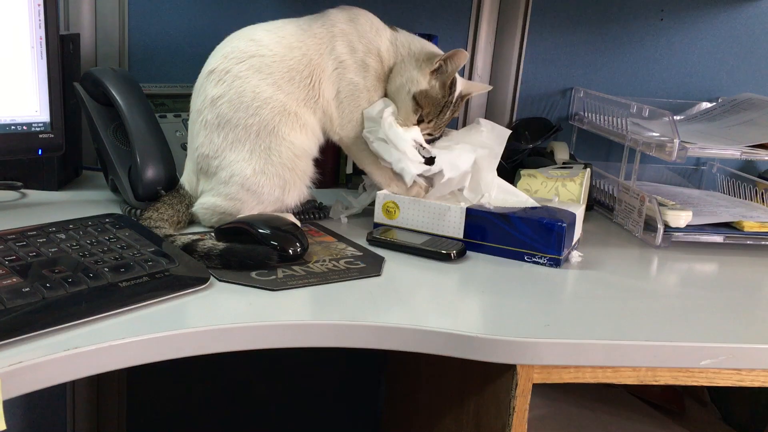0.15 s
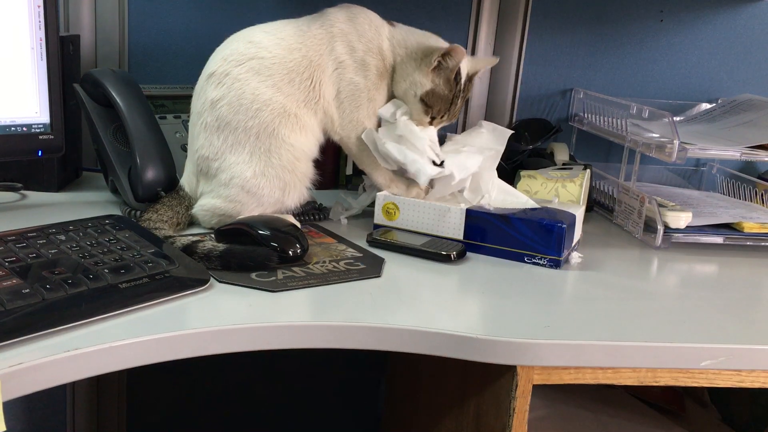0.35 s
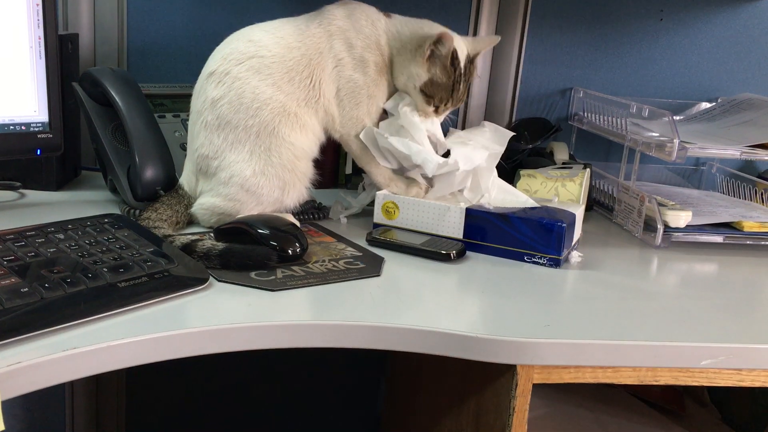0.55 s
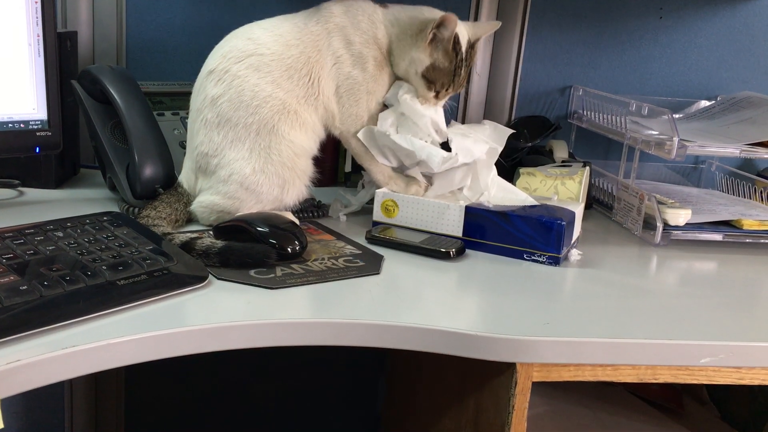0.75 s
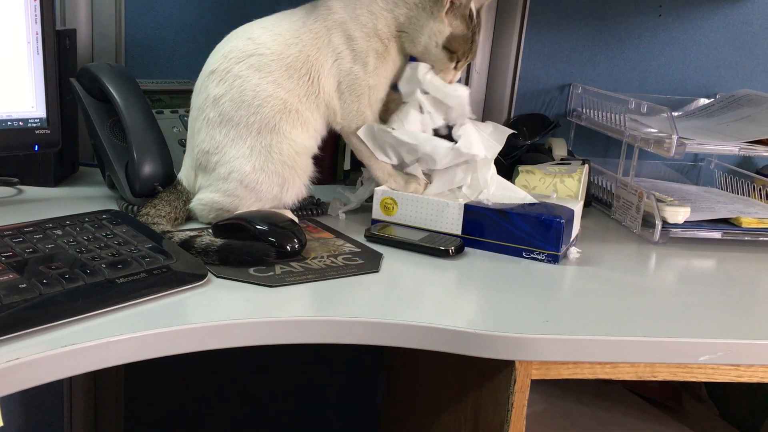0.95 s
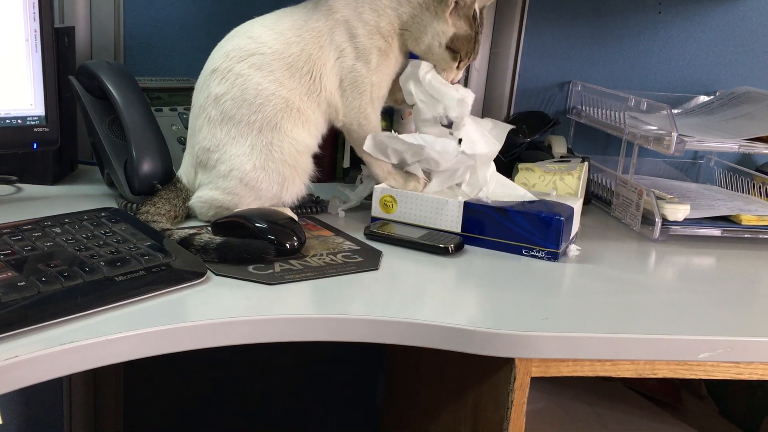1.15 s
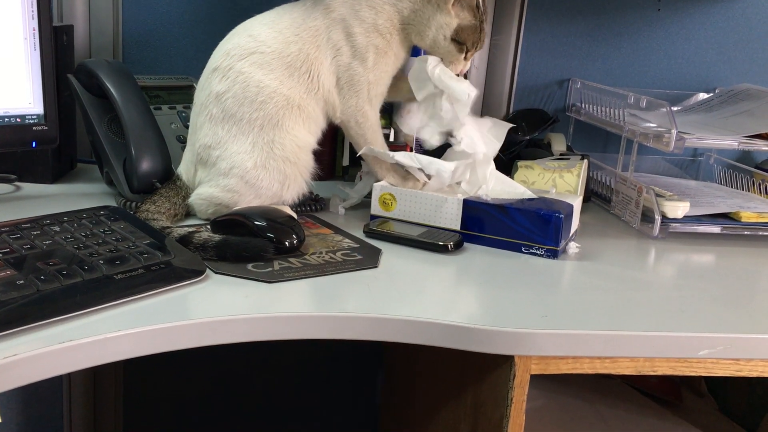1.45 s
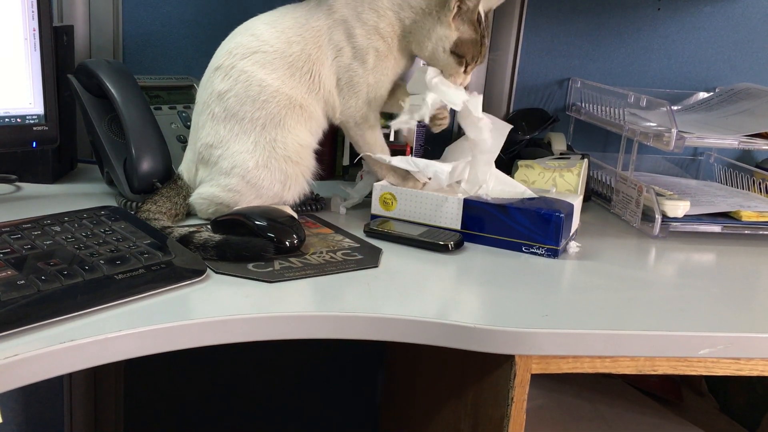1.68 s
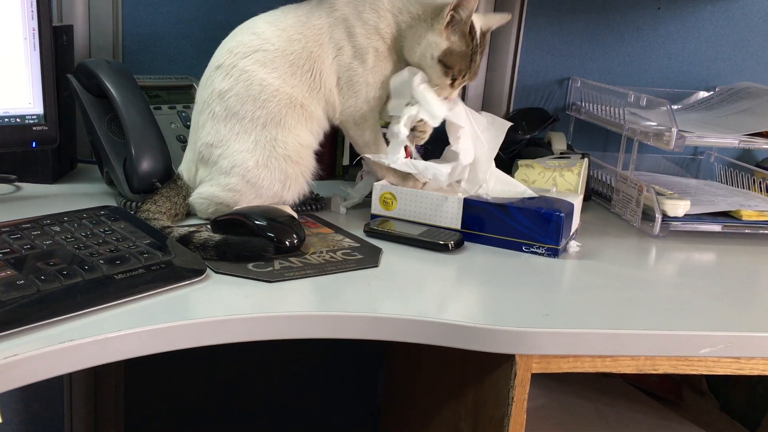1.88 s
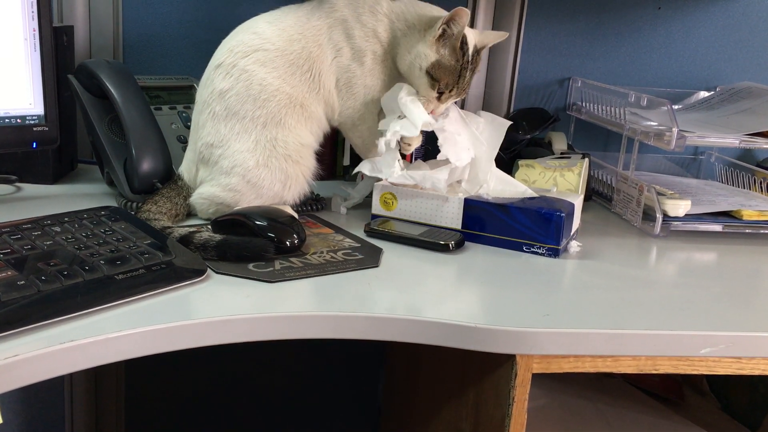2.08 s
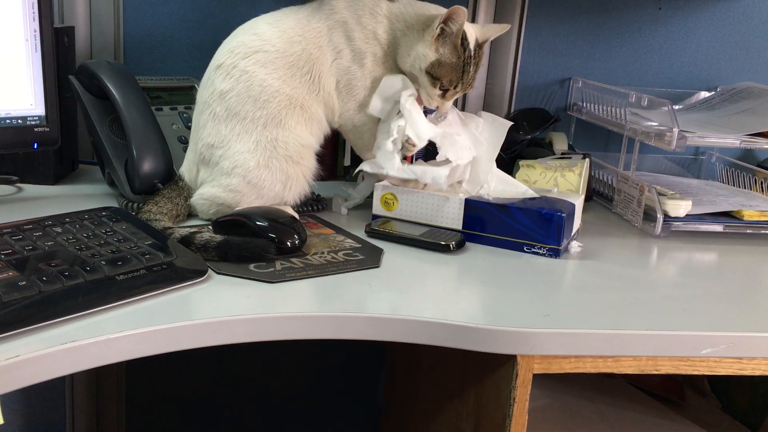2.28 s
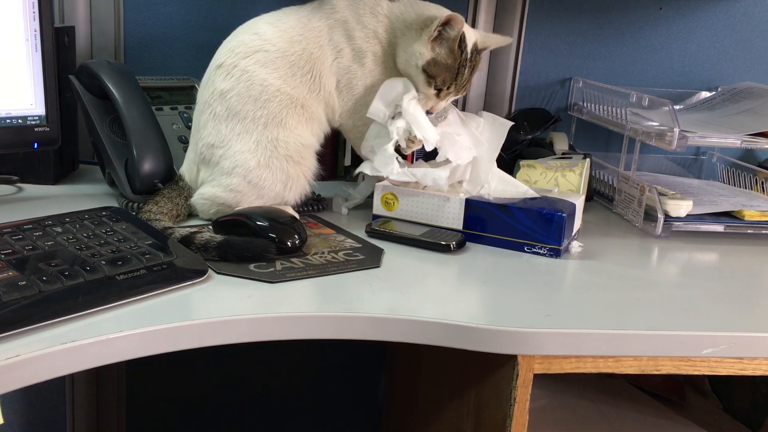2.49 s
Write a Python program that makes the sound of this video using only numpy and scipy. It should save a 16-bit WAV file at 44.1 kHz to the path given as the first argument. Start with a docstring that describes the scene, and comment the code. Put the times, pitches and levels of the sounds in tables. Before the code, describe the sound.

Light paper rustles lead to short, dry tears and sharp ticks, then quiet shuffling; close room with a short diffuse tail, steady airy fan noise, and a low throbbing hum that sags and rises, microphone fairly near.

```python
"""A cat tugs at tissue paper on an office desk: clicks of snapping fibres make short rips and ticks,
and softer, denser clicks make rustles, all with a short diffuse tail. A deep gliding sine, perhaps a
heavy engine outside, sags in pitch and then picks up. Ventilation is filtered noise and wavering tones,
over a low rumble with soft swells and a faint climbing tone."""
import sys
import numpy as np
from scipy import signal
from scipy.fft import rfft, irfft
from scipy.io import wavfile
from scipy.ndimage import uniform_filter1d

SR = 44100
rng = np.random.default_rng(int(sys.argv[2]) if len(sys.argv) > 2 else 0)


def output_pcm(signal):
    """Save a mono or channel-first signal as 16-bit PCM at the path in sys.argv[1].

    Samples are clipped to [-1, 1] before scaling.
    """
    pcm = np.clip(np.atleast_2d(signal).T, -1, 1) * 32767
    wavfile.write(sys.argv[1], SR, np.round(pcm).astype(np.int16))


N = 115983
TIME_S = np.arange(N) / SR


def undb(db):
    """Decibels to amplitude gain."""
    return 10 ** (np.asarray(db) / 20)


def unit(x):
    """Scale to rms 1."""
    return x / np.sqrt(np.mean(x ** 2))


def noise():
    """White noise of rms near 1."""
    return rng.standard_normal(N)


def walk(rate):
    """Smooth random wander with a spread near 1, from random steps at this rate per second."""
    hold = int(SR / rate)
    steps = rng.standard_normal(2048)[np.arange(N) // hold]
    return 1.229 * uniform_filter1d(uniform_filter1d(steps, hold), hold)


def curve(points):
    """Join (time_s, value) points by straight lines."""
    return np.interp(TIME_S, *np.array(points).T)


def colour(x, points, tilt_db=0):
    """Filter by (freq_hz, gain_db) points and a tilt per octave, falling away beyond the ends; rms 1."""
    octave = np.log2(np.maximum(np.fft.rfftfreq(N, 1 / SR), 1))
    hz, db = np.array(points).T
    gain = undb(np.interp(octave, np.log2(hz), db) + tilt_db * octave)
    low_skirt = 2 ** octave / hz[0]
    high_skirt = hz[-1] / 2 ** octave
    skirts = np.minimum(np.minimum(low_skirt, high_skirt), 1) ** 2
    return unit(irfft(rfft(x) * gain * skirts, N))


def envelope(start, length, attack, release):
    """Rise linearly, hold, then die away exponentially; all in seconds."""
    age = TIME_S - start
    rise = np.clip(age / attack, 0, 1)
    return rise * np.exp(-np.maximum(age - length, 0) / release)


def crackle(rate, scatter_db):
    """Tiny clicks of either sign at random moments, a few much larger than the rest."""
    size = undb(scatter_db * np.minimum(rng.exponential(size=N), 5))
    hits = rng.random(N) < rate / SR
    return hits * size * rng.choice([-1, 1], N)


def line(hz, waver_db):
    """A tone of rms near 1 that wavers in pitch and level."""
    turns = np.cumsum(hz + HUM_DRIFT_HZ * walk(14)) / SR + rng.random()
    return np.sqrt(2) * undb(waver_db * walk(11.61)) * np.sin(2 * np.pi * turns)


# tugs that tear the paper: start_s, length_s, level_db
RIP_TUGS = [(0.912, 0.043, -65.5), (0.955, 0.041, -61.5), (1.03, 0.022, -67.5), (1.26, .025, -61.5),
            (1.37, .02, -62), (1.404, 0.01, -52), (1.428, .02, -65), (1.453, 0.0094, -72),
            (1.622, 0.039, -69)]
# tone of breaking fibres, also used by the snaps: freq_hz, gain_db
FIBRE_COLOUR = [(900, -26), (2200, -2), (3400, 7), (5000, 1.5), (8000, 0), (10400, -3.5), (11800, -0.5),
                (13500, -5), (15500, -7)]
RIP_ATTACK_S, RIP_RELEASE_S = 0.011, 0.021
FIBRES_PER_S, FIBRE_SCATTER_DB = 3200, 2.5
BUNCHES_PER_S, BUNCH_DB = 320, 0.5


def rips():
    """Fibres break in uneven bunches at each tug, a dense spray of clicks."""
    power = sum((undb(db) * envelope(start, length, RIP_ATTACK_S, RIP_RELEASE_S)) ** 2
                for start, length, db in RIP_TUGS)
    pull = np.sqrt(power)
    bunches = undb(BUNCH_DB * walk(BUNCHES_PER_S))
    fibres = bunches * crackle(FIBRES_PER_S, FIBRE_SCATTER_DB)
    return pull * colour(fibres, FIBRE_COLOUR)


# single strands giving way: start_s, level_db (before the halving in snaps)
STRANDS = [(.942, -51), (.975, -50), (.9847, -50), (0.99, -42), (1.0388, -48), (1.273, -53), (1.285, -52),
           (1.3825, -46), (1.4295, -47), (1.4416, -43), (1.443, -43), (1.4485, -41), (1.644, -56)]
SNAP_DECAY_S = 0.00067


def snaps():
    """Thicker strands part with a small tick of fast-dying noise."""
    burst = sum(undb(db) * envelope(start, 0, 1 / SR, SNAP_DECAY_S) for start, db in STRANDS)
    return burst * colour(noise(), FIBRE_COLOUR) / 2


# paper sliding and crumpling: start_s, length_s, level_db, brightness_db_per_octave
PAPER_MOVES = [(-.02, 0.022, -51.5, 5), (0.2, 0.076, -66, 3.5), (0.566, 0.12, -63.5, 2.5),
               (0.666, 0.17, -61, 0.3), (0.89, 0.085, -57.5, -3.5), (1.087, 0.038, -58.5, 0),
               (1.134, 0.066, -66, 2.5), (1.37, 0.18, -61, -1.5), (1.563, 0.022, -72, 6),
               (1.804, 0.033, -61.5, 1), (2.318, 0.17, -61, -6)]
# tone of flipping creases: freq_hz, gain_db
CREASE_COLOUR = [(400, -40), (1200, 21), (3500, 9), (6500, -0.5), (9300, -4), (10400, -9), (12000, -9),
                 (15500, -18)]
RUSTLE_ATTACK_S, RUSTLE_RELEASE_S = 0.015, 0.025
CREASES_PER_S, CREASE_SCATTER_DB = 5800, 4.5


def rustles():
    """Soft creases flip, each a tiny click, as the sheet is pawed and dragged."""
    total = np.zeros(N)
    for start, length, db, brightness in PAPER_MOVES:
        creases = colour(crackle(CREASES_PER_S, CREASE_SCATTER_DB), CREASE_COLOUR, brightness)
        total += undb(db) * envelope(start, length, RUSTLE_ATTACK_S, RUSTLE_RELEASE_S) * creases
    return total


OFFICE_T60_S, OFFICE_DB = 0.3, -9.5


def office(x):
    """Desk and partitions add a short diffuse tail of decaying noise."""
    t = np.arange(SR // 2) / SR
    tail = rng.standard_normal(len(t)) * np.exp(-np.log(1000) * t / OFFICE_T60_S)
    return x + undb(OFFICE_DB) * signal.fftconvolve(x, tail / np.linalg.norm(tail))[:N]


# glide of the deep drone: time_s, pitch_hz, level_db
DRONE_GLIDE = [(0, 46.9, -26), (.2, 46.24, -24), (.36, 45, -31), (.46, 43.55, -26.5), (.6, 43.04, -31),
               (.81, 42.38, -36.5), (.86, 42.9, -26.5), (.91, 41.7, -35), (.99, 41.1, -33.5),
               (1.02, 41.1, -26), (1.201, 42.84, -24), (1.352, 48.13, -23), (1.63, 51.05, -28.5),
               (1.75, 51.36, -26.5), (1.949, 53.77, -31.5), (2.249, 53.47, -30.5), (2.46, 53.8, -29.5),
               (2.63, 52.8, -28)]
# moments at which the drone dips briefly: time_s
DRONE_DIPS = [.088, .165, 0.249, 1.103, 1.262]
# drone overtones: multiple, level_db (at the reference pitch)
DRONE_OVERTONES = [(2, -44.5), (3, -52.5), (4, -65), (5, -62), (7, -61.5)]
DIP_DB, DIP_WIDTH_S = -10.5, 0.015
REFERENCE_HZ, OVERTONE_DB_PER_HZ = 54.8, 1
# the throb is deep at LOW_HZ and below, shallow towards the reference pitch
THROB_HZ, THROB_DEPTH, THROB_DEPTH_LOW, LOW_HZ = 14, 0.064, 0.26, 42.3


def drone():
    """A deep gliding sine: a second one above it beats into a throb, and overtones grow with pitch."""
    rows = np.array(DRONE_GLIDE)
    hz = curve(rows[:, [0, 1]])
    dips = sum(np.exp(-((TIME_S - s) / DIP_WIDTH_S) ** 2) for s in DRONE_DIPS)
    db = curve(rows[:, [0, 2]]) + DIP_DB * dips
    phase = 2 * np.pi * np.cumsum(hz) / SR
    beat = 2 * np.pi * np.cumsum(THROB_HZ * (1 + 0.158 * walk(6.29))) / SR
    depth = np.interp(hz, [LOW_HZ, REFERENCE_HZ], [THROB_DEPTH_LOW, THROB_DEPTH])
    tone = undb(db) * (np.sin(phase) + depth * np.sin(phase + beat))
    overtones = sum(undb(level) * np.sin(round(multiple) * phase + walk(7.3))
                    for multiple, level in DRONE_OVERTONES)
    growth = undb(OVERTONE_DB_PER_HZ * (hz - REFERENCE_HZ))
    return np.sqrt(2) * (tone + growth * overtones)  # sine peak to rms


# tone of the air rush: freq_hz, gain_db
AIR_COLOUR = [(250, 8), (430, 2.5), (700, 0.5), (1000, 0.5), (1600, -4), (2100, -8), (2700, -14),
              (3300, -14.5), (4400, -18.5), (5000, -22), (6300, -23), (7700, -29), (9500, -30),
              (10400, -37.5), (11500, -35), (15500, -39.5)]
# loudness of the air rush: time_s, level_db
AIR_LOUDNESS = [(0, -49.5), (.47, -50.5), (.85, -49.5), (1.1, -50), (1.65, -50.5), (2, -49), (2.63, -49.5)]
# steady fan lines: pitch_hz, level_db
FAN_LINES = [(236, -57.5), (353, -66), (531, -70.5), (601, -75), (649, -68.5), (826, -71.5), (1653, -71),
             (2477, -79), (2713, -85), (3246, -80.5), (3774, -89.5)]
# swelling loudness of the strongest fan line: time_s, level_db
WHINE_LOUDNESS = [(0, -67), (.21, -51.5), (.27, -58.5), (.37, -53.5), (.42, -65), (.61, -58.5), (.73, -53),
                  (.98, -59), (1.19, -53.5), (1.47, -58.5), (1.62, -61), (1.69, -51), (1.89, -62.5),
                  (2.1, -57), (2.31, -52), (2.4, -63), (2.57, -57.5), (2.63, -55)]
HUM_WAVER_DB, HUM_DRIFT_HZ = 2.5, 2.2
WHINE_HZ, WHINE_WAVER_DB = 479.6, 0.6
FLUTTERS_PER_S, FLUTTER_DB = 34, 2.5


def ventilation():
    """Rushing air as filtered noise, and fan lines as wavering sines."""
    air = undb(curve(AIR_LOUDNESS)) * colour(noise(), AIR_COLOUR)
    hum = sum(undb(db) * line(hz, HUM_WAVER_DB) for hz, db in FAN_LINES)
    whine_db = curve(WHINE_LOUDNESS) + FLUTTER_DB * walk(FLUTTERS_PER_S)
    whine = undb(whine_db) * line(WHINE_HZ, WHINE_WAVER_DB)
    return air + hum + whine


# soft swells in the rumble: start_s, length_s, centre_hz, level_db
RUMBLE_SWELLS = [(0.637, .2, 243, -51.5), (0.753, 0.099, 360, -52), (1.26, 0.15, 117, -45.5),
                 (1.46, 0.079, 235, -51), (1.55, .2, 100.3, -46), (1.87, 0.23, 219, -50)]
SWELL_ATTACK_S, SWELL_RELEASE_S = 0.037, 0.045
SWELL_SPREAD, SWELL_SKIRT_DB = 1.56, 30  # frequency ratio to each band edge, and the drop there


def swells():
    """Narrow noise bands in the rumble rise and fade."""
    total = np.zeros(N)
    for start, length, hz, db in RUMBLE_SWELLS:
        band = [(hz / SWELL_SPREAD, -SWELL_SKIRT_DB), (hz, 0), (hz * SWELL_SPREAD, -SWELL_SKIRT_DB)]
        swell = envelope(start, length, SWELL_ATTACK_S, SWELL_RELEASE_S)
        total += undb(db) * swell * colour(noise(), band)
    return total


# tone of the room rumble: freq_hz, gain_db
RUMBLE_COLOUR = [(20, -16.5), (30, -5), (55, 3), (80, 4.5), (100, -1), (120, -1), (140, -6), (170, -3.5),
                 (195, -12), (270, -8.5), (320, -18.5), (375, -16.5), (450, -36), (700, -57)]
# loudness of the room rumble: time_s, level_db
RUMBLE_LOUDNESS = [(0, -36.5), (.22, -44.5), (.42, -39.5), (.6, -42.5), (.78, -40), (1.02, -43),
                   (1.35, -41.5), (1.8, -39.5), (2.1, -41.5), (2.63, -38.5)]
# faint tone that climbs slowly in the rumble: time_s, pitch_hz, level_db
CLIMBING_TONE = [(0, 286.8, -52.5), (.22, 292.4, -49), (.55, 293, -64), (.85, 302, -57), (1.25, 305.2, -54),
                 (1.5, 308.5, -61), (2.2, 325.7, -61), (2.38, 326, -51.5), (2.63, 330, -57.5)]


def rumble():
    """Low filtered noise with a faint climbing sine in it."""
    rows = np.array(CLIMBING_TONE)
    tone = undb(curve(rows[:, [0, 2]])) * line(curve(rows[:, [0, 1]]), waver_db=2.5)
    return undb(curve(RUMBLE_LOUDNESS)) * colour(noise(), RUMBLE_COLOUR) + tone


def scene():
    """Paper in the office, over drone, ventilation, swells and rumble."""
    paper = office(rips() + snaps() + rustles())
    return (paper + drone() + ventilation() + swells() + rumble())[None]


TOP_HZ = 15650


def record(dry):
    """The recorder cuts the top with a steep low-pass."""
    low_pass = signal.ellip(10, 0.2, 80, TOP_HZ, fs=SR, output="sos")
    return signal.sosfilt(low_pass, dry)


dry = scene()
out = record(dry)
output_pcm(out)
```